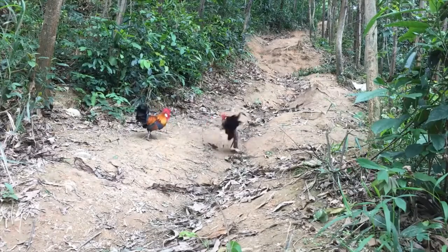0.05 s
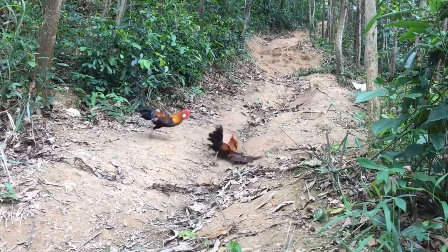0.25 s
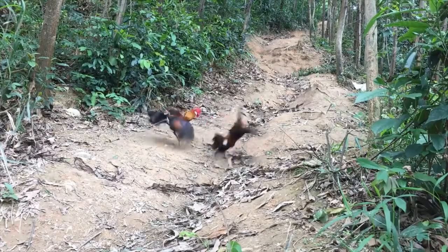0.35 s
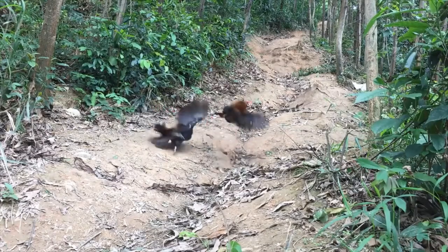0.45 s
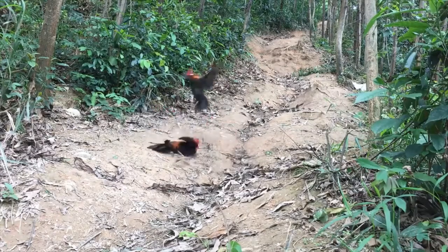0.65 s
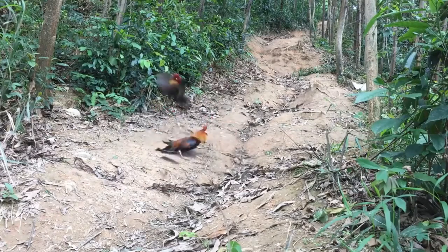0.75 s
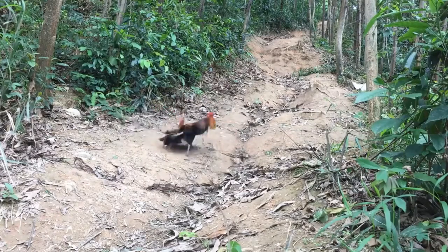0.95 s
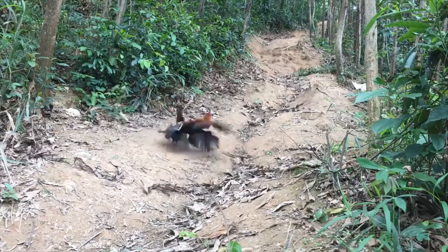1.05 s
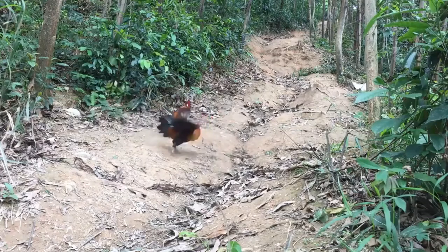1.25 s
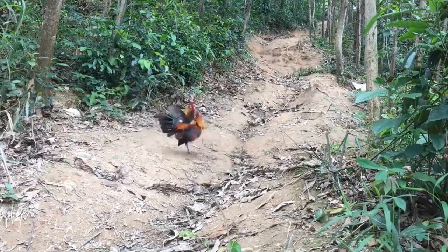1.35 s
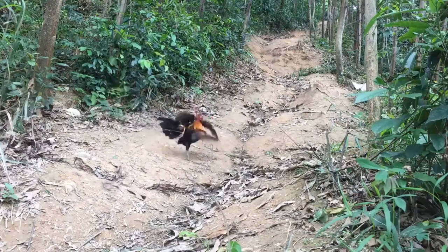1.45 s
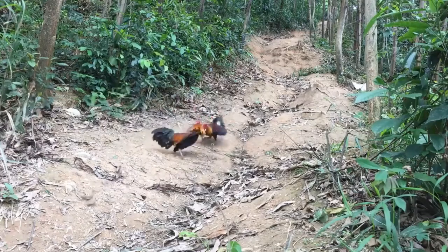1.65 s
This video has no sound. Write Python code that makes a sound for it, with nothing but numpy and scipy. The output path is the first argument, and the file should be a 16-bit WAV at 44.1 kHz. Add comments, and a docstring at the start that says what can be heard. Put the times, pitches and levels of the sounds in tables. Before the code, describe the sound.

Two roosters fight with sharp, irregular wing flaps and slaps, their claws scraping dry earth and leaves a few metres away. A small bird whistles faintly once at the start, over quiet forest air.

```python
"""A dirt path at the edge of a forest, where two roosters fight a few metres away.
Claws scrape dry earth and leaves; wings swish, slap, rasp and push thumps of air, over a steady rustle.
A small bird whistles once in the distance as the fight begins. The trees scatter it all back,
and under it lie a faint outdoor hiss and a far low drone."""
import sys
import numpy as np
from scipy import signal
from scipy.io import wavfile

SR = 44100
rng = np.random.default_rng(int(sys.argv[2]) if len(sys.argv) > 2 else 0)


def transcribe(signal):
    """Save signal, clipped to [-1, 1], as a 16-bit WAV file at the path in sys.argv[1]."""
    frames = np.atleast_2d(signal).T
    limited = np.clip(frames, -1, 1)
    pcm = np.round(limited * 32767).astype(np.int16)
    wavfile.write(sys.argv[1], SR, pcm)


N = 74970


def amp(db):
    """Decibels to gain."""
    return 10 ** (np.asarray(db) / 20)


def unit(x):
    """Scales to rms 1."""
    return x / np.sqrt(np.mean(x ** 2) + 1e-20)


def add(mix, start_s, sound):
    """Mixes a sound in at a time, trimming what falls outside the mix."""
    at = round(start_s * SR)
    sound = sound[max(-at, 0):]
    part = mix[max(at, 0):][:len(sound)]
    part += sound[:len(part)]


def band(x, low_hz, high_hz):
    """Causal band-pass."""
    edges = [low_hz, min(high_hz, SR / 2 - 100)]
    return signal.sosfilt(signal.butter(3, edges, "band", fs=SR, output="sos"), x)


def tint(x, points):
    """Minimum-phase EQ through (Hz, dB) points: colours x without smearing its attacks backwards."""
    size = 4096
    hz, db = np.transpose(points)
    bin_hz = abs(np.fft.fftfreq(size, 1 / SR))
    log_gain = np.log(amp(np.interp(np.log(bin_hz + 1), np.log(hz), db)))
    kernel = np.fft.ifft(np.exp(np.conj(signal.hilbert(log_gain)))).real[:size // 2]
    return signal.fftconvolve(x, kernel)[:len(x)]


def grit(count, clump_s, clump_db):
    """Noise of countless tiny contacts that bunch into clumps."""
    t = np.arange(count) / SR
    knots = np.arange(0, t[-1] + clump_s, clump_s)
    sizes = np.clip(rng.standard_normal(N), -2, 2)[:len(knots)]
    return unit(rng.standard_normal(N)[:count] * amp(clump_db * np.interp(t, knots, sizes)))


def crackle(count, clump_s, clump_db, snaps_per_s=900, spread_db=3.5, snap_fall_s=0.00067, snap_share=0.29):
    """Grit mixed with the separate snaps of dry leaves and quills."""
    t = np.arange(SR // 200) / SR
    onsets = rng.random(count) < snaps_per_s / SR
    strengths = amp(spread_db * np.minimum(rng.exponential(1, count), 3))
    envelope = signal.fftconvolve(onsets * strengths, np.exp(-t / snap_fall_s))[:count]
    snaps = envelope * rng.standard_normal(count)
    return np.sqrt(1 - snap_share) * grit(count, clump_s, clump_db) + np.sqrt(snap_share) * unit(snaps)


def burst(contacts, envelope, levels_db, colour_wander=0.019):
    """A shower of contacts under an envelope, balanced in four bands; its colour shifts with each blow."""
    # The tone of each blow, notched by its echo off the ground.
    # Each row: frequency in Hz, relative level in dB.
    colour = [(200, 1), (380, 4), (490, -1), (660, 5), (800, 3.5), (1020, 12), (1350, 5), (1850, 6),
              (2400, -1), (3300, 6), (4300, 3), (5000, -6), (6500, 2), (7800, -4.5), (9500, 1.5),
              (10700, -7.5), (12500, 1), (15500, -10)]
    # The edges in Hz of the four bands: body, middle, quill and hiss.
    edges_hz = [190, 700, 2150, 4600, 17000]
    shift = np.exp(colour_wander * rng.standard_normal())
    coloured = tint(envelope * contacts, [(hz * shift, db) for hz, db in colour])
    bands = [unit(band(coloured, low, high)) for low, high in zip(edges_hz, edges_hz[1:])]
    return np.sqrt(np.mean(envelope ** 2)) * (amp(levels_db) @ np.array(bands))


def tussle():
    """Churned air, ruffled plumage and crackling litter between the blows."""
    # The swells of the rustle. Each row: time in seconds, then air, plumage and litter levels in dB.
    swells = [(0, -70, -68.5, -72), (.1, -61.5, -66.5, -69), (.16, -70, -61, -57), (0.21, -75, -51, -37.5),
              (0.389, -66, -62, -49.5), (.44, -43, -49.5, -55), (.51, -48, -51.5, -49), (.6, -44, -45, -49),
              (.78, -42, -47, -69), (.88, -43, -49.5, -62), (.93, -44, -49.5, -59), (1.0, -48, -43.5, -58),
              (1.07, -45.5, -65, -40.5), (1.14, -36, -52, -51), (1.19, -57, -64, -56),
              (1.36, -63, -62.5, -46), (1.43, -54, -49, -49), (1.55, -50.5, -52, -48.5),
              (1.7, -78, -77.5, -72)]
    # The tone of each of the three layers. Each row: frequency in Hz, relative level in dB.
    air_eq = [(20, -47), (45, 0), (75, 6), (170, -2.5), (280, -5), (420, -12), (700, -33), (2000, -78)]
    plumage_eq = [(30, -51), (120, -13.5), (350, 0), (650, -2.5), (1150, -2.5), (1800, -4), (2400, -5.5),
                  (3600, -4.5), (5000, -9), (16000, -14.5)]
    litter_eq = [(50, -61), (300, -72), (2000, -15), (3600, 5.5), (5000, 0), (6500, -3.5), (10500, -4),
                 (13000, -6.5), (16000, 4)]
    times, *curves_db = np.transpose(swells)
    air_gain, plumage_gain, litter_gain = (amp(np.interp(np.arange(N) / SR, times, db)) for db in curves_db)
    air = unit(tint(grit(N, clump_s=0.007, clump_db=3.5), air_eq))
    plumage = unit(tint(grit(N, clump_s=0.006, clump_db=3.0), plumage_eq))
    litter = unit(tint(crackle(N, clump_s=0.00077, clump_db=7.5), litter_eq))
    return air_gain * air + plumage_gain * plumage + litter_gain * litter


def small_bird(fade_s=0.011, echo_s=0.072, echo_db=-10):
    """One thin, slowly falling whistle in the distance, and its echo."""
    # The whistle's contour. Each row: time in seconds, pitch in Hz, level in dB.
    contour = [(0, 3120, -76), (.02, 3120, -65.5), (0.046, 3130, -49.5), (0.063, 3130, -59),
               (0.088, 3095, -51), (0.111, 3005, -57.5), (.142, 2984, -55), (.168, 2970, -74),
               (.192, 2950, -54), (.232, 2960, -56)]
    times, hz, db = np.transpose(contour)
    t = np.arange(N) / SR
    level = amp(np.interp(t, times, db)) * np.clip((times[-1] - t) / fade_s, 0, 1)
    phase = 2 * np.pi * np.cumsum(np.interp(t, times, hz)) / SR
    whistle = np.sqrt(2) * level * np.sin(phase)
    out = whistle.copy()
    add(out, echo_s, amp(echo_db) * whistle)
    return out


def scuffs(rise_share=0.46, fall_s=0.0083):
    """Sand and dry leaves crunch under a sliding foot."""
    # Claws and feathers dragged over the ground. Each row: start and length in seconds,
    # then body, middle, quill and hiss levels in dB.
    drags = [(0.1, 0.054, -56, -56, -58, -62), (0.202, 0.024, -61, -44.5, -47, -40),
             (0.222, 0.042, -59.5, -47.5, -45, -43), (1.386, 0.053, -40.5, -45.5, -40.5, -45.5)]
    out, t = np.zeros(N), np.arange(SR // 4) / SR
    for start, length, *levels_db in drags:
        attack = np.minimum(t / (rise_share * length), 1)
        release = np.exp(-np.maximum(t - length, 0) / fall_s)
        crunch = crackle(len(t), clump_s=0.00315, clump_db=1.0)
        add(out, start, burst(crunch, attack * release, levels_db))
    return out


def slaps(rise_s=0.00015, front_db=6):
    """Short cracks where a wing or a foot lands: a sharp jump of pressure, then a rattle."""
    # Hits of stiff feathers and feet. Each row: start and fall time in seconds,
    # then body, middle, quill and hiss levels in dB.
    hits = [(.1315, 0.0021, -46, -45, -40.5, -56), (0.167, 0.009, -70, -55, -48, -44),
            (0.3136, 0.0012, -32, -27, -35.5, -30), (.5184, .0024, -42, -34, -28, -32),
            (.5234, .001, -35, -35, -24, -35), (0.5403, 0.00094, -49, -38, -39, -30),
            (0.5508, 0.0013, -46, -47, -33, -39), (0.7838, 0.0038, -61, -43, -35.5, -37.5),
            (0.824, 0.0038, -40, -55, -39, -47), (0.9648, 0.0036, -28.5, -24, -22, -31.5),
            (1.0086, 0.0021, -50, -35, -38, -34.5), (1.029, 0.0027, -21.5, -30, -42, -35),
            (1.1214, 0.00057, -13, -11, -13.5, -11), (1.1325, 0.00043, -36, -32, -13.5, -33),
            (1.2467, 0.0011, -25, -20.5, -21, -26), (1.3338, 0.0018, -67, -62, -39, -42.5),
            (1.385, 0.0032, -39, -47, -38, -38.5), (1.5122, 0.0038, -39, -38, -32, -29.5),
            (1.5328, 0.0011, -25.5, -33, -23, -35)]
    out, t = np.zeros(N), np.arange(SR // 20) / SR
    for start, fall, *levels_db in hits:
        envelope = np.minimum(t / rise_s, 1) * np.exp(-t / fall)
        front = amp(front_db) * signal.unit_impulse(len(t), np.argmax(envelope))
        rattle = grit(len(t), clump_s=0.000373, clump_db=-2)
        add(out, start, burst(rattle - front, envelope, levels_db))
    return out


def wings():
    """Feathers rattle over each other, swelling to the end of each stroke."""
    # Wing strokes. Each row: moment of the peak, rise time and fall time in seconds,
    # then body, middle, quill and hiss levels in dB.
    strokes = [(.315, 0.0066, 0.013, -39, -35.5, -35.5, -34.5),
               (.421, 0.0055, 0.016, -50.5, -46.5, -45.5, -44.5),
               (.444, 0.005, 0.0033, -45.5, -40.5, -46, -47), (.458, 0.0078, 0.013, -46, -45, -42.5, -46),
               (.553, 0.01, 0.0096, -39, -41.5, -41, -42.5),
               (.655, 0.015, 0.0091, -39.5, -38.5, -44, -51.5),
               (0.721, 0.0061, 0.014, -45.5, -37, -41, -42.5),
               (.752, 0.0057, 0.004, -40.5, -33.5, -39, -45.5), (0.829, 0.0058, 0.01, -53, -41, -37.5, -44),
               (.957, 0.0058, 0.004, -39, -32.5, -36, -45), (.978, 0.015, 0.0081, -34, -41, -41, -48),
               (1.0065, 0.0016, 0.002, -48, -48, -31, -30), (1.018, 0.0063, 0.0079, -31, -32, -32, -38),
               (1.032, 0.0055, 0.0024, -21.5, -29, -26, -34),
               (1.105, 0.022, 0.0098, -39, -40, -42.5, -48.5),
               (1.118, 0.003, 0.011, -28.5, -27.5, -22.5, -29.5),
               (1.131, 0.0026, 0.018, -41, -47, -36.5, -31),
               (1.2237, 0.0044, 0.0096, -35.5, -35, -41, -40.5),
               (1.2445, 0.0088, 0.0072, -35, -34, -29, -31), (1.528, 0.0076, 0.014, -39.5, -42, -39, -36),
               (1.536, 0.0085, 0.0061, -43, -53, -39.5, -60)]
    out, t = np.zeros(N), np.arange(-SR // 10, SR // 5) / SR
    for peak, rise, fall, *levels_db in strokes:
        envelope = np.exp(-abs(t) / np.where(t < 0, rise, fall))
        feathers = grit(len(t), clump_s=0.00094, clump_db=3.5)
        add(out, peak + t[0], burst(feathers, envelope, levels_db))
    return out


def thumps():
    """Each push of air is a brief, low swing of pressure."""
    # Air pushed by a wing or a breast. Each row: centre in seconds, pitch in Hz, level in dB,
    # swell time in seconds.
    pushes = [(0.321, 155, -37, 0.0047), (0.426, 182, -43, 0.0058), (0.464, 197, -39, 0.0047),
              (0.568, 280, -28.5, 0.0011), (0.581, 110, -35.5, 0.0062), (0.638, 125, -37.5, 0.0058),
              (0.654, 379.5, -25.5, 0.0048), (0.676, 168, -30.5, 0.0025), (.724, 101, -33.5, 0.0051),
              (.7522, 394, -28.5, 0.0026), (.757, 134, -32, 0.0033), (0.831, 155, -34, 0.0016),
              (.962, 149, -33, 0.0059), (.979, 218, -26.5, 0.0018), (1.022, 147, -29, 0.0033),
              (1.034, 147, -25.5, 0.0037), (1.086, 376, -29.5, 0.0016), (1.103, 179, -32.5, 0.007),
              (1.127, 172, -28.5, 0.0046), (1.228, 147, -39.5, 0.0032), (1.248, 90, -47, 0.014),
              (1.413, 90, -41, 0.0029), (1.447, 177, -41.5, 0.01), (1.501, 198, -33, 0.0026)]
    out, t = np.zeros(N), np.arange(-SR // 20, SR // 20) / SR
    for centre, hz, db, swell in pushes:
        envelope = amp(db) * np.sqrt(2) * np.exp(-(t / swell) ** 2)
        add(out, centre + t[0], envelope * np.sin(2 * np.pi * hz * t))
    return out


def rasps(width_share=0.18):
    """Friction in one narrow resonance that glides as quills slide over each other."""
    # Slides of feathers or claws. Each row: start and length in seconds, first and last pitch in Hz,
    # level in dB.
    slides = [(.518, 0.0072, 4054, 3850, -37), (.5205, 0.0063, 930, 900, -36),
              (0.569, 0.026, 3680, 2670, -48.5), (0.82, 0.091, 1235, 1132, -48),
              (1.385, 0.0075, 2120, 2100, -45), (1.52, 0.0072, 6340, 9600, -36.5)]
    out = np.zeros(N)
    for start, length, first_hz, last_hz, db in slides:
        progress = np.linspace(0, 1, round(length * SR))
        # Two slow noises on a gliding carrier make a noise band, its width a share of the first pitch.
        lowpass = signal.butter(2, first_hz * width_share / 2, fs=SR, output="sos")
        cos_noise, sin_noise = signal.sosfilt(lowpass, rng.standard_normal((2, N)))[:, -len(progress):]
        phase = 2 * np.pi * np.cumsum(first_hz + (last_hz - first_hz) * progress) / SR
        friction = cos_noise * np.cos(phase) + sin_noise * np.sin(phase)
        arch = np.sqrt(progress * (1 - progress))
        add(out, start, amp(db) * unit(arch * friction))
    return out


def forest(x, echoes_per_s=3000, build_s=0.0018, crossfade_hz=1.685):
    """Faint, bright echoes from foliage; two echo patterns slowly crossfade, keeping the tail diffuse."""
    # Scatter from trunks and leaves. Each row: low and high edge in Hz, level in dB,
    # seconds to die away by 60 dB.
    scatter = [(140, 1030, -28.5, 0.27), (833, 3140, -20, 0.38), (2580, 5660, -14.5, 0.43),
               (4930, 21000, -11, 0.52)]
    out, t = np.zeros(N), np.arange(SR) / SR
    for wave in (np.sin, np.cos):
        echoes = rng.standard_normal(SR) * (rng.random(SR) < echoes_per_s / SR)
        echoes *= np.minimum(t / build_s, 1)
        tail = sum(amp(db) * unit(band(echoes, low, high) * amp(-60 * t / t60))
                   for low, high, db, t60 in scatter)
        crossfade = wave(2 * np.pi * crossfade_hz * np.arange(N) / SR)
        out += signal.fftconvolve(x * crossfade, tail / np.sqrt(SR))[:N]
    return out


def ambience(hiss_db=-82, drone_db=-64):
    """The faint hiss of still air among the trees, and a far low drone."""
    # The tone of the still air. Each row: frequency in Hz, relative level in dB.
    hiss_eq = [(20, -14), (60, -4), (150, 1), (250, -2), (700, -6), (2000, 8), (6000, -34), (16000, -15)]
    hiss = unit(tint(rng.standard_normal(N), hiss_eq))
    drone = unit(band(rng.standard_normal(N + SR), low_hz=74, high_hz=106.6)[SR:])
    return amp(hiss_db) * hiss + amp(drone_db) * drone


def scene():
    """The fight and the whistle, echoed by the trees, over the outdoor bed; mono."""
    birds = wings() + slaps() + rasps() + thumps() + scuffs() + tussle() + small_bird()
    return (birds + forest(birds) + ambience())[None]


def record(dry):
    """A steep low-pass trims the very top of the treble."""
    cutoff_hz = 16050
    lowpass = signal.firwin(511, cutoff_hz, window=("kaiser", 9), fs=SR)
    return signal.oaconvolve(dry, lowpass[None], "same")


dry = scene()
out = record(dry)
transcribe(out)
```